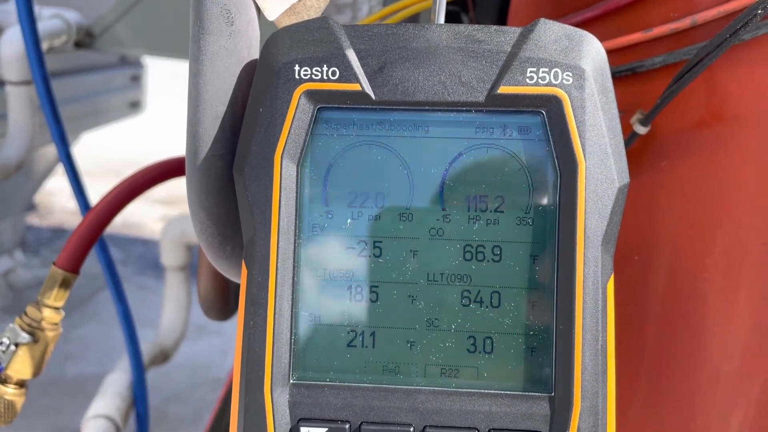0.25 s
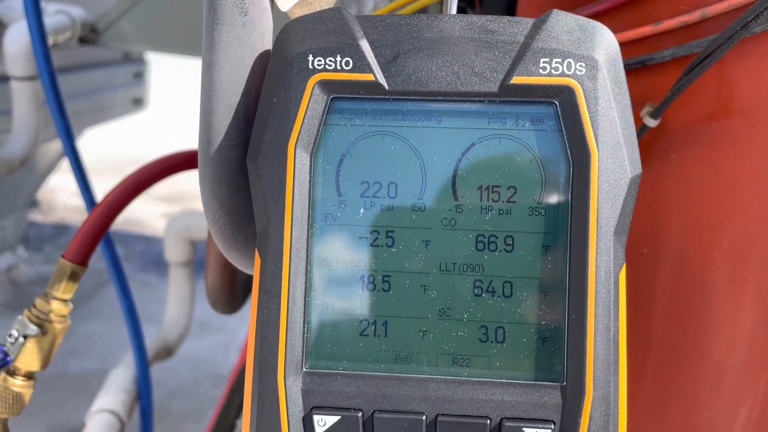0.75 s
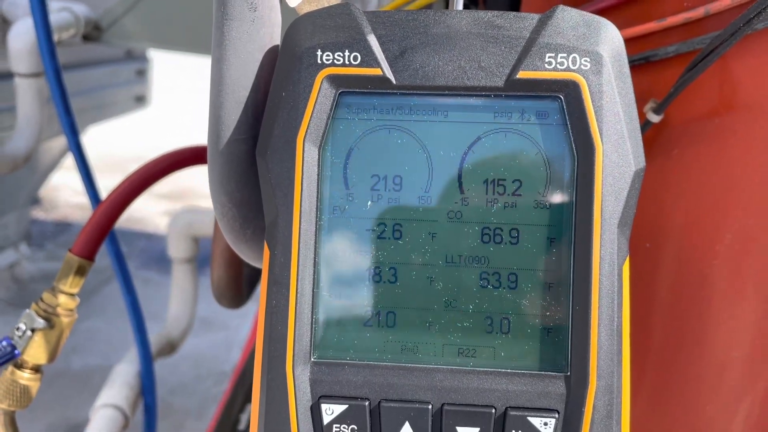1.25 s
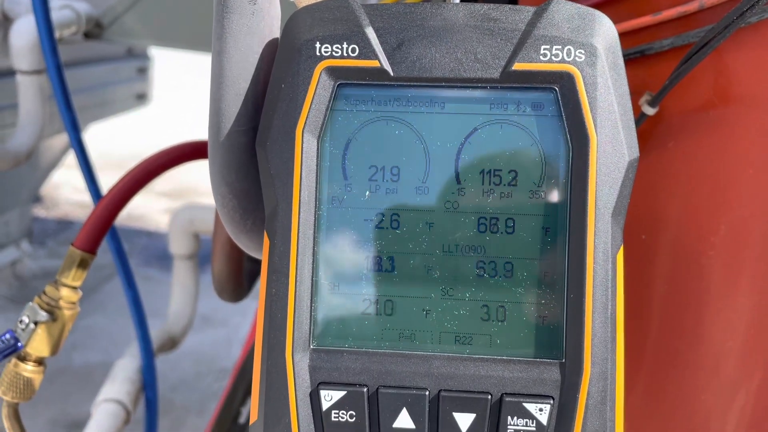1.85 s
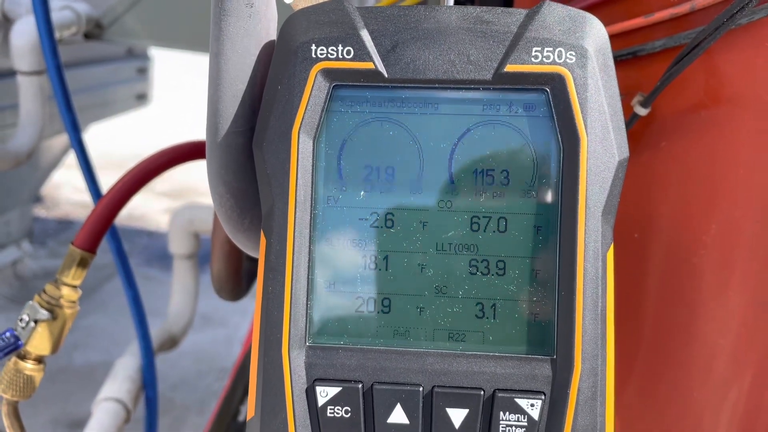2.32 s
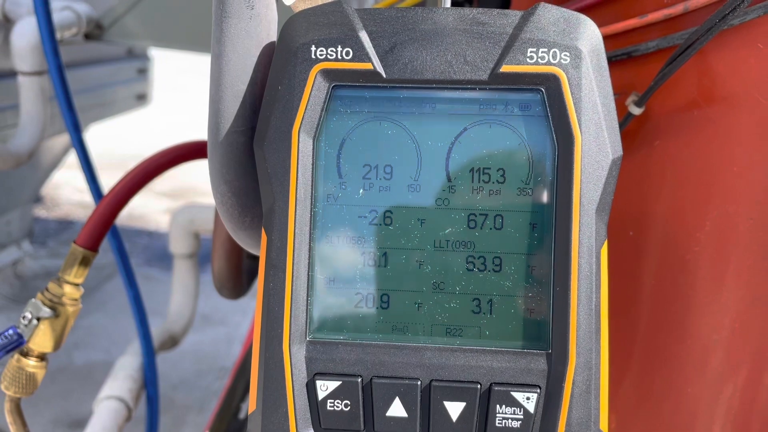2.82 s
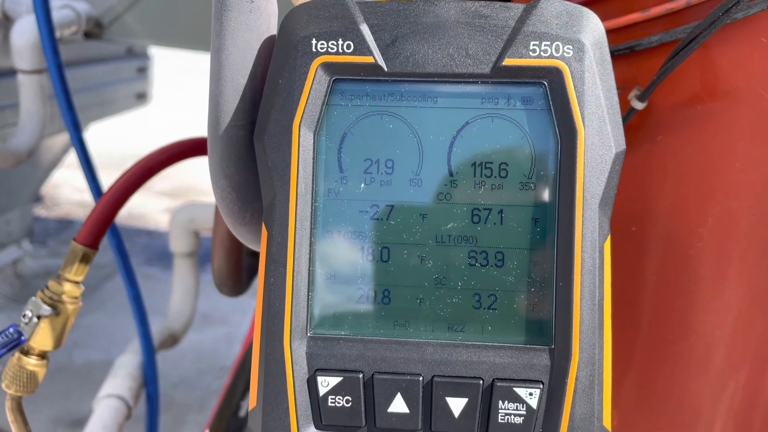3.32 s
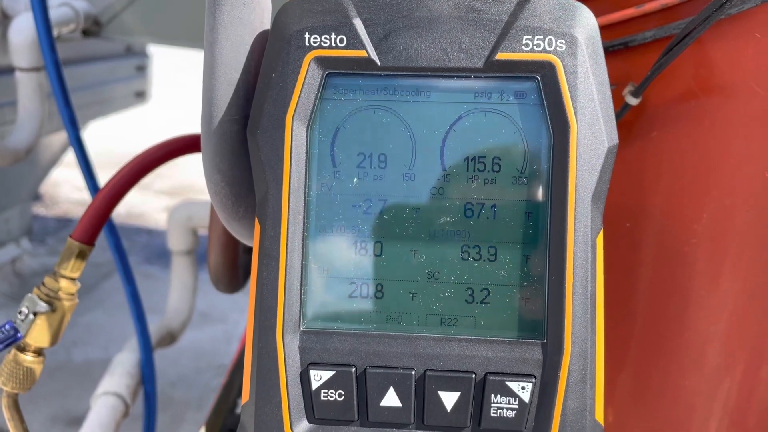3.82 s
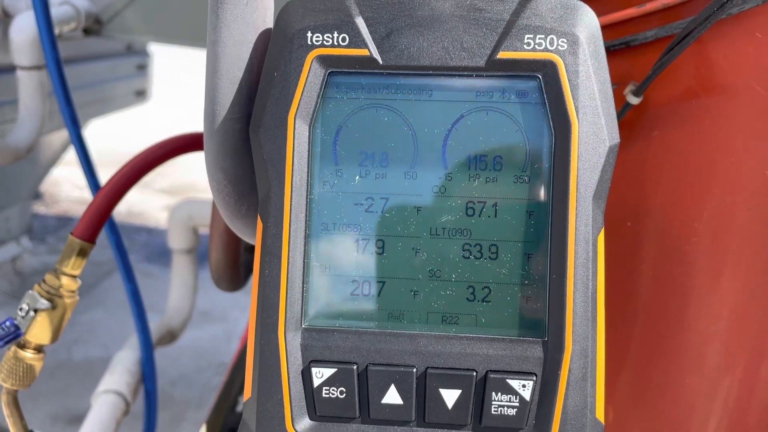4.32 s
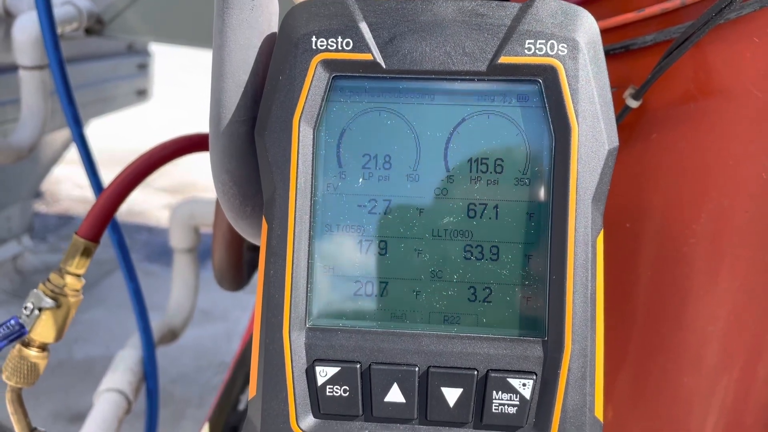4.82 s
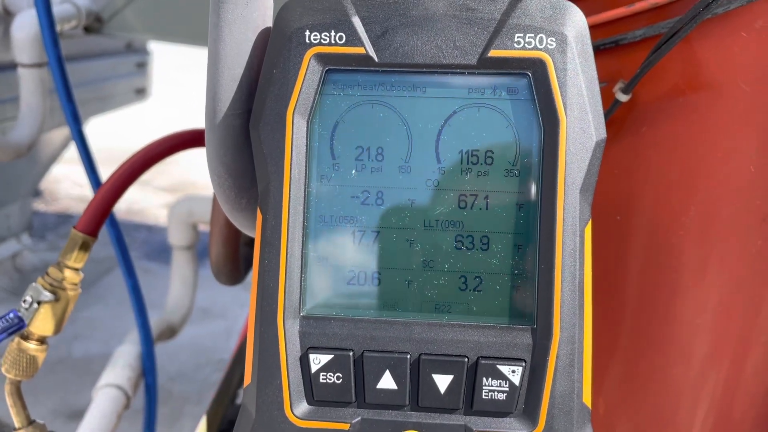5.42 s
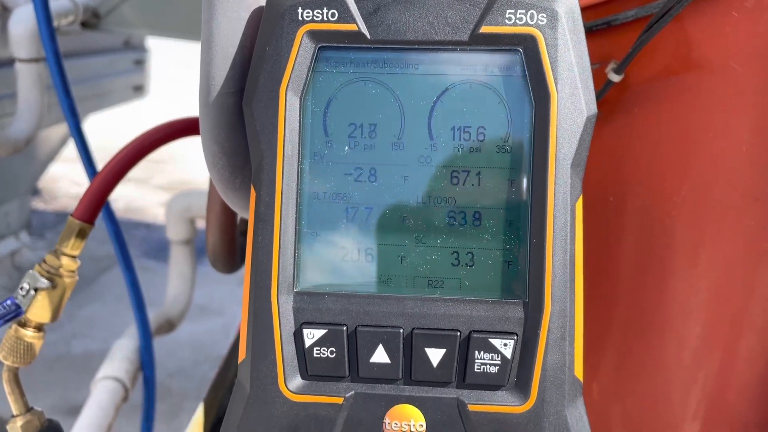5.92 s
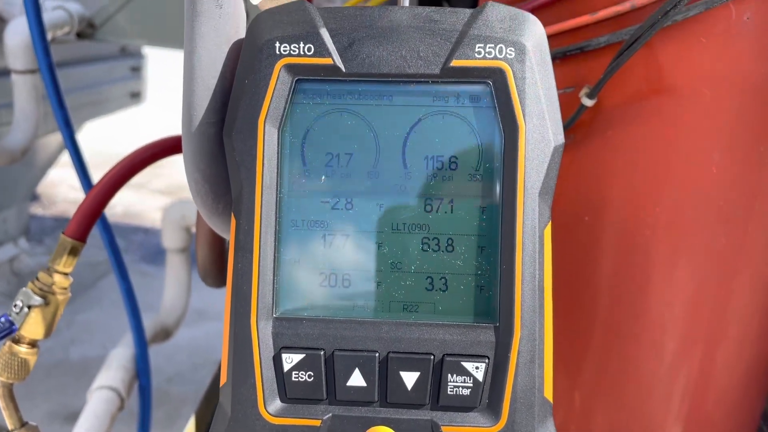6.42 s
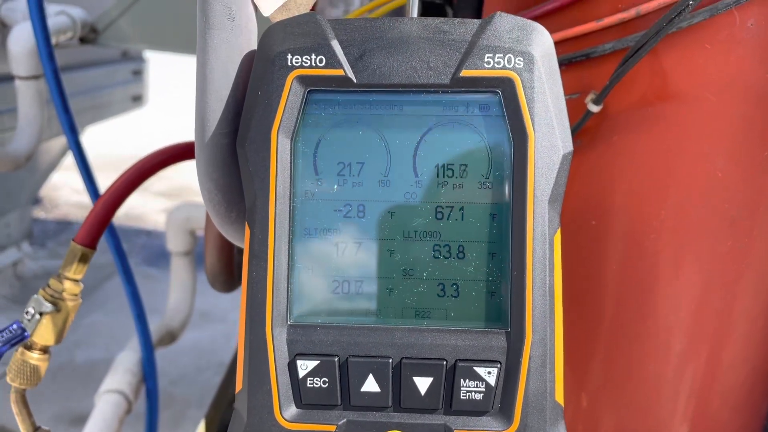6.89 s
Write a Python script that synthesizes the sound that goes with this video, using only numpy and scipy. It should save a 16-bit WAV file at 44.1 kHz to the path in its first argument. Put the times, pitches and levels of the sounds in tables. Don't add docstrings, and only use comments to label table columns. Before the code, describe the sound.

From the start, an air conditioning compressor drones close by on an open rooftop, already running and never changing speed. Its low hum is near 59 hertz, stacked with clean overtones up to a thin whine; a valve knocks once per turn, so fast it fuses into a rough buzz. Gas and fan air hiss steadily, with faintly pulsing treble. Wind rumbles directly on the hand-held stereo microphone, with flaps and hard slaps from about 0.8 to 1.8 seconds, especially around 1.4. Another fluttering cluster hits near 2.5, with a smaller bump at 3. From roughly 3 to 5 the wind eases, leaving the machine clear. At about 5.4 a loose panel's narrow, high buzz flares, again near 6.1, as the microphone turns away and some treble softens. Low gusts thump from 5.6 to 6.3, a sharp slap lands near 6.6, then the wind weakens while the drone continues to about 7.1.

```python
import sys
import numpy as np
from scipy import signal
from scipy.fft import rfft, irfft, next_fast_len
from scipy.io import wavfile
from scipy.ndimage import uniform_filter1d, map_coordinates

SR = 44100
rng = np.random.default_rng(int(sys.argv[2]) if len(sys.argv) > 2 else 0)


def undo_db(level):
    steps = np.asarray(level, float) / 20
    return 10 ** steps


def wav_out(sig):
    wavfile.write(sys.argv[1], SR, np.round(np.clip(np.atleast_2d(sig).T, -1, 1) * 32767).astype(np.int16))


N = 315315

# [t/s, strength/dB]
WIND_STRENGTH = [(0, -23.5), (.1, -22), (.63, -20.5), (.8, -28), (.95, -19.5), (1.3, -20), (1.8, -25),
                 (1.9, -34), (2.35, -26.5), (2.9, -36.5), (3.7, -31), (4.2, -40), (4.9, -26), (5.5, -26),
                 (5.8, -21), (6.45, -24.5), (6.8, -33), (7.15, -29)]
# [t/s, length/s, peak/dB, eddy pitch/octaves over 60 Hz]
GUSTS = [(0.842, 0.073, -20.5, 0), (1.076, .03, -15, 0.6), (1.163, 0.045, -17.5, .1),
         (1.445, 0.11, -18, 1.2), (1.564, 0.04, -21.5, 0.87), (1.668, 0.069, -19, 0.8),
         (1.733, .04, -21, 1.04), (1.78, 0.044, -21, -0.7), (1.992, 0.052, -26, 0.7),
         (2.114, 0.032, -25, 1.65), (2.467, 0.081, -29.5, 3.5), (2.613, 0.089, -28.5, 2),
         (2.824, 0.032, -23.5, 1.5), (2.99, .07, -26, 0), (3.282, 0.13, -26.5, 1.64),
         (3.743, 0.056, -28, 1.4), (4.08, .09, -28, 0.5), (4.33, 0.12, -30.5, 1.1),
         (5.39, 0.045, -24, 0.55), (5.53, 0.037, -25, 0.2), (5.651, 0.036, -15, -0.8),
         (5.78, 0.073, -20.5, -0.4), (5.883, 0.04, -14.5, 1.05), (5.97, 0.066, -12.5, 0),
         (6.133, 0.029, -10.5, -0.1), (6.199, 0.047, -14, .5), (6.258, 0.04, -17.5, 1.5),
         (6.33, 0.082, -21.5, 1.16), (6.57, .04, -19.5, 3), (6.666, 0.087, -23.5, 0.83)]
# [pitch/octaves over 60 Hz, level/dB in a mean wind, growth/dB per dB of strength]
WIND_LAYERS = [
    (0, -27, 1),
    (1.1, -29.5, 0.24),
    (2.7, -40.5, -0.07),
    (3.5, -41.5, -0.16),
]
# [f/Hz, density/dB per Hz]
EDDY_SPECTRA = [
    [(15, -36), (35, -17.5), (60, 2), (85, -3.5), (110, -26.5), (200, -67)],
    [(65, -36), (95, 3), (150, -6), (260, -9), (330, -39)],
    [(230, -42), (290, 4.5), (520, 4.5), (600, -50)],
    [(480, -27), (570, -2.5), (900, -12), (1600, -28), (3000, -50)],
]
EDDY_SPLIT_DB = [-16.5, -9, -2.5, -4]
# [t/s, peak/dB, f/Hz, left over right/dB]
SLAPS = [(1.072, -12.5, 291, 0), (1.227, -9, 200, 2), (1.401, -1, 228, 1), (1.439, -7, 245, 0),
         (1.457, -18, 221, 0.0), (1.473, 0, 246, 2), (1.551, -10, 473, 3), (1.654, -12, 467, 1.5),
         (1.716, -6.5, 277, -0.5), (2.423, -9, 266, 0.5), (2.431, -18, 288, 1.5), (2.45, -6, 220, 0.5),
         (2.474, -11, 371, 4), (2.487, -8, 277, 2), (2.598, -8.5, 460, 0.5), (2.973, -10, 221, 0),
         (5.885, -21, 231, -0.5), (5.965, -18, 250, -1.5), (6.12, -21, 293, 3), (6.243, -7.5, 260, 0.0),
         (6.266, -11, 386, -1.0), (6.306, -14, 221, 4), (6.539, -8, 221, 2), (6.55, -9, 221, -0.5),
         (6.558, -10, 458, -0.5), (6.565, -11, 425, 2), (6.57, -14, 471, 0.0), (6.5761, -0.5, 304, -3),
         (6.603, -6, 255, 4), (7.037, -17, 288, 0.5)]
# [f/Hz, density/dB per Hz]
HISS_SPECTRUM = [(60, -59.5), (300, -62.5), (600, -70), (1200, -75.5), (2000, -77), (3000, -84),
                 (4300, -82.5), (4950, -84.5), (5400, -82), (7000, -84.5), (9000, -87), (10300, -87),
                 (13000, -91), (16000, -89)]
# [f/Hz, difference over sum/dB, lead of difference/rad, likeness/0-1]
PORTS = [(60, -13, -4.5, .2), (500, 0, -1.56, 0.5), (1510, 1, -0.9, 0), (2140, -2, 2.1, 0),
         (3500, -3, 0.5, 0.1), (4540, 0, 1.4, 0.4), (5900, -8, 1.4, 0.1), (6900, -0.5, -2.3, 0.7),
         (8200, 3.5, 1.5, .9), (9000, -0.5, 2.5, 0.6), (12500, -10, -1, 0.7)]
# [t/s, speed/turns per s]
SHAFT_SPEED = [(0, 59.185), (1, 59.184), (3.5, 59.192), (7.15, 59.195)]
# [f/Hz, level/dB]
WEAK_ORDERS = [(600, -51), (1500, -78), (2500, -61), (3000, -63), (3700, -62.5), (5000, -65), (5600, -61),
               (6800, -65.5), (8000, -79), (9500, -75), (10200, -69), (11000, -72), (13000, -84),
               (16000, -85)]
# [multiple of the shaft,
# level/dB, port difference/dB]
STRONG_ORDERS = [(1, -37, -14), (2, -42, -11), (3, -41, -17), (4, -47, -10), (5, -36, -14), (6, -44, -10),
                 (7, -45, -9), (8, -36, -6), (9, -43, -11), (10, -50, -6), (11, -57, 8), (12, -49, -8),
                 (14, -47, -9), (15, -49, -4), (16, -51, -1), (17, -56, 8), (18, -47, -12), (19, -52, -1),
                 (21, -48, 0), (22, -46, -14), (23, -49, -12), (25, -50, -1), (29, -55, -9), (32, -52, -7),
                 (34, -53, -12), (35, -52, -9), (36, -51, -12), (38, -56, -9), (39, -47, -9),
                 (40, -57, -11), (42, -57, 0), (43, -58, -10), (51, -60, 4), (68, -58, 2), (70, -58, -13),
                (100, -59, -30), (41, -55, -12), (46, -51, -2), (54, -54, -15), (57, -55, -4),
                (58, -51, -14), (59, -54, -14), (61, -54, -20), (62, -54, -10), (66, -52, -3),
                (67, -54, -9), (72, -53, -1), (73, -55, 1), (75, -53, -1), (77, -53, -6), (81, -57, -18),
                (88, -57, -20), (89, -51, -19), (90, -51, -8), (91, -51, -18), (92, -54, -22),
                (97, -54, -26), (103, -54, -30), (119, -60, -4)]
# [f/Hz, moment in the turn/0-1, phase scatter/rad]
KNOCK_BANDS = [(500, .3, 2), (780, .3, 1), (1350, .13, .15), (2100, .7, .85), (2600, .8, 1),
               (3300, .42, .8), (3800, .12, 1.2), (4400, .66, .25), (4900, .6, .7), (5400, .51, .4),
               (6000, .72, 1), (6600, .55, .9), (10000, .62, 1.1)]
# [f/Hz, width/Hz, port difference/dB]
HEAD_ON_BAND = (5870, 420, -16)
# [t/s, share/0-1]
CAMERA_TURN = [(0, 0), (.9, 0.03), (1.15, 0), (3.5, 0), (5.45, 0), (5.6, 0.3), (6.05, 0.7), (6.2, 1),
               (7.15, 1)]
# [f/Hz, width/Hz, level/dB]
SHADED_BANDS = [(4430, 420, -3), (5300, 250, -1), (6560, 290, -5)]
# [t/s, gain/dB, fade/s]
PANEL_FLARES = [
    (5.44, 5, 0.77),
    (6.1, 3, 1.1),
]
# [f/Hz, level/dB]
SUM_GAIN = [(7100, 0.5), (7550, -6.5), (7700, -50), (8700, -52), (8800, -6.5), (9600, -3), (12700, -2),
            (13400, -12), (13750, -13), (13800, -70)]
# [f/Hz, level/dB]
DIFFERENCE_GAIN = [(9800, 0), (10350, -3), (10500, -12), (11000, -17), (11100, -70), (12350, -70),
                   (12450, 1), (13300, 0), (13800, 3)]


def unit(x):
    return x / np.sqrt(np.mean(x ** 2, axis=-1, keepdims=True) + 1e-20)


def along(points, hz):
    f, *columns = np.transpose(points)
    return [np.interp(np.log(hz + 1), np.log(f + 1), c) for c in columns]


def curves(rows):
    s, *columns = np.transpose(rows)
    return [np.interp(np.arange(N) / SR, s, c) for c in columns]


def wobble(rate):
    knots = rng.standard_normal(int(N * rate / SR) + 4)
    return map_coordinates(knots, [np.arange(N) * rate / SR])


def filtered(x, response):
    m = next_fast_len(N + 8192)
    hz = np.fft.rfftfreq(m, 1 / SR)
    return irfft(rfft(x, m) * response(hz), m)[..., :N]


def left_right(both, apart):
    return np.array([both + apart, both - apart])


def gust_levels():
    mean_wind_db = -27
    crest = 0.6
    above_db, below_db = -4.5, -1.5
    strength_db = curves(WIND_STRENGTH)[0] - mean_wind_db
    octave, rest_db, grows = np.transpose(WIND_LAYERS)
    power = undo_db(2 * (rest_db[:, None] + grows[:, None] * strength_db))
    for s, length, db, pitch in GUSTS:
        life = np.arange(round(2 * length * SR)) / (2 * length * SR)
        shape = np.sin(np.pi / 2 * np.minimum(life / crest, (1 - life) / (1 - crest))) ** 4
        away = octave - pitch
        reach_db = np.where(away > 0, above_db * away ** 2, -below_db * away)
        start = round((s - 2 * length * crest) * SR)
        power[:, start:][:, :len(life)] += undo_db(2 * (db + reach_db))[:, None] * shape
    return np.sqrt(power)


def wind():
    lump_rates, lump_depths_db = (21, 36, 60, 90), (0.48, 2.3, 2.4, 2.9)
    shared, out = wobble(30), 0
    layers = zip(gust_levels(), EDDY_SPECTRA, EDDY_SPLIT_DB, lump_rates, lump_depths_db)
    for level, spectrum, split_db, rate, lumps_db in layers:
        noise = filtered(rng.standard_normal((2, N)), lambda hz: undo_db(along(spectrum, hz)[0]))
        alone = np.array([wobble(rate), wobble(rate)])
        eddies = noise * undo_db(lumps_db * (1.4 * shared + alone))
        strength = uniform_filter1d(uniform_filter1d(eddies ** 2, size=2000), size=2000)
        steady = unit(eddies / np.abs(strength) ** 0.45)
        out = out + level * undo_db([[0], [split_db]]) * steady
    return out


def slaps():
    out, t = np.zeros((2, N + SR)), np.arange(SR // 20) / SR
    for s, db, hz, pan_db in SLAPS:
        rise, decay = 1 - np.exp(-3 * t * hz), undo_db(-60 * t * hz / 5)
        swing = np.sin(2 * np.pi * hz * t) * decay * rise
        sides = undo_db([[pan_db / 2], [-pan_db / 2]])
        out[:, round(s * SR):][:, :len(t)] += undo_db(db + 2.5) * sides * swing
    return out[:, :N]


def buffeted_ports():
    longest_swing = .95
    push = left_right(*wind()) + slaps()
    swing = push / (1 + (push / longest_swing) ** 4) ** (1 / 4)
    return filtered(swing, lambda hz: 1 / (1 + (hz / 1800) ** 4))


def turns():
    start_turn = .065
    steady = start_turn + np.cumsum(curves(SHAFT_SPEED)[0]) / SR
    return steady + 0.0015 * wobble(2.85) + 0.00043 * wobble(30)


def patchy(x, depth_db):
    hz, _, z = signal.stft(x, SR, nperseg=512)
    field = rng.standard_normal(z.shape[1:])
    field = uniform_filter1d(uniform_filter1d(field, size=3, axis=0), size=7, axis=1)
    field = field / field.std() * np.clip(hz[:, None] / 11000, .2, 1.3)
    return signal.istft(z * undo_db(depth_db * field), SR, nperseg=512)[1][:, :N]


def hiss(angle):
    common, separate = patchy(rng.standard_normal((2, N)), depth_db=2.6)
    puff = .25 * np.cos(2 * np.pi * (angle - .62))
    common = common + filtered(common * puff, lambda hz: hz > 3800)

    def gain(hz):
        return undo_db(along(HISS_SPECTRUM, hz)[0]) * np.sqrt(SR / 2)

    def difference_gain(hz):
        split_db, lead, alike = along(PORTS, hz)
        alike = np.clip(alike, 0, 1)
        return gain(hz) * undo_db(split_db) * [alike * np.exp(1j * lead), np.sqrt(1 - alike ** 2)]

    both = filtered(common, gain)
    apart = filtered(np.array([common, separate]), difference_gain).sum(axis=0)
    swell = undo_db(.3 * wobble(2) + .4 * wobble(9))
    return swell * np.array([both, apart])


def compressor(angle):
    size = 8192
    hz = np.arange(size // 2 + 1) * SHAFT_SPEED[0][1]
    chance = rng.standard_normal((3, len(hz)))
    split_db, lead, _ = along(PORTS, hz)
    level_db = along(WEAK_ORDERS, hz)[0] + 4 * chance[0]
    centre_hz, width_hz, head_on_db = HEAD_ON_BAND
    split_db = split_db + 3 * chance[1] + head_on_db * np.exp(-((hz - centre_hz) / width_hz) ** 2)
    order, db, difference_db = np.transpose(STRONG_ORDERS)
    order = order.astype(int)
    level_db[order], split_db[order] = db, difference_db

    knock = np.array(KNOCK_BANDS)
    nearest = np.abs(np.log((hz[:, None] + 1) / knock[:, 0])).argmin(axis=1)
    scatter = along(KNOCK_BANDS, hz)[1] * chance[2]
    phase = -2 * np.pi * np.cumsum(knock[nearest, 1]) + scatter
    lines = undo_db(level_db) * np.exp(1j * phase) * (hz > 0) * (hz < 15750) * size / np.sqrt(2)
    lines = lines * [np.ones(len(hz)), undo_db(split_db) * np.exp(1j * lead)]

    def play(orders):
        place = [angle % 1 * size]
        return np.array([map_coordinates(c, place, order=1, mode="grid-wrap") for c in irfft(orders)])

    loose = np.clip(hz / 5000, .3, 1.5)
    drift = 0
    for rate in (.6, 2, 7):
        scrambled = lines * np.exp(2j * np.pi * rng.random(lines.shape))
        drift = drift + wobble(rate) * play(loose * scrambled)
    return play(lines) + .11 * drift


def aimed(x):
    panel_hz, panel_width_hz, flare_rise_s = 3890, 47, .08

    def band(centre_hz, width_hz):
        return filtered(x, lambda hz: np.exp(-((hz - centre_hz) / width_hz) ** 4))

    t, turned = np.arange(N) / SR, curves(CAMERA_TURN)[0]
    flare_db = 0
    for s, db, fade in PANEL_FLARES:
        rise = np.clip((t - s) / flare_rise_s, 0, 1)
        flare_db = flare_db + db * rise * np.exp(-np.abs(t - s) / fade)
    shaded = sum((undo_db(db * turned) - 1) * band(hz, width) for hz, width, db in SHADED_BANDS)
    return x + shaded + (undo_db(flare_db) - 1) * band(panel_hz, panel_width_hz)


def scene():
    angle = turns()
    machine = aimed(compressor(angle) + hiss(angle))
    return buffeted_ports() + left_right(*machine)


def band_limit(x):
    return signal.sosfilt(signal.butter(12, 15750, fs=SR, output="sos"), x)


def record(dry):
    left, right = dry
    both = filtered((left + right) / 2, lambda hz: undo_db(along(SUM_GAIN, hz)[0]))
    apart = filtered((left - right) / 2, lambda hz: undo_db(along(DIFFERENCE_GAIN, hz)[0]))
    mix = left_right(both, apart)
    return band_limit(mix)


dry = scene()
out = record(dry)
wav_out(out)
```